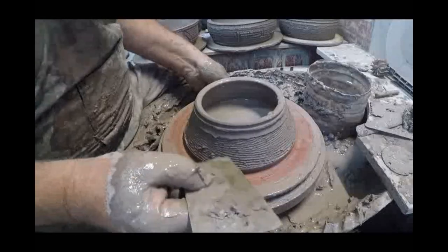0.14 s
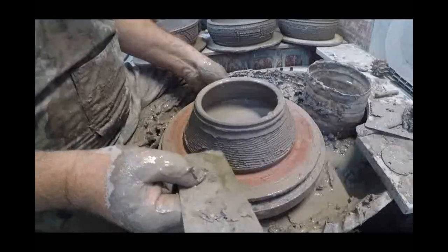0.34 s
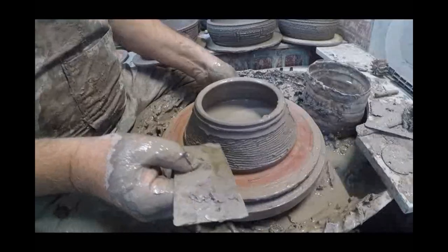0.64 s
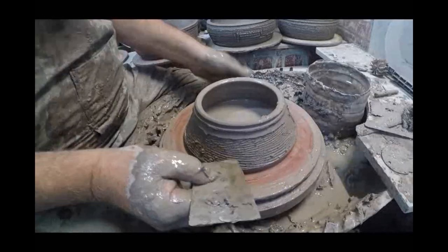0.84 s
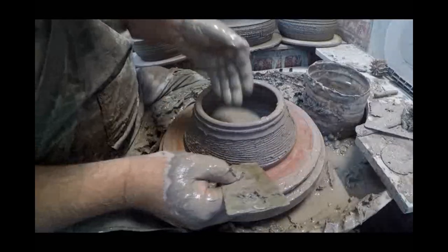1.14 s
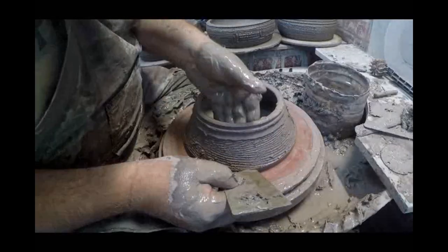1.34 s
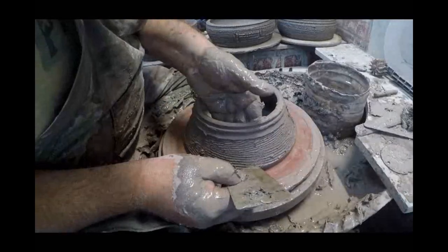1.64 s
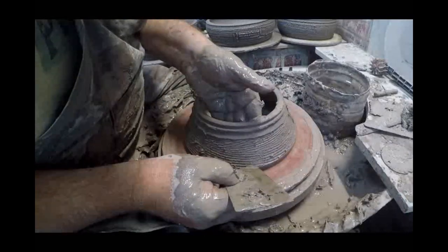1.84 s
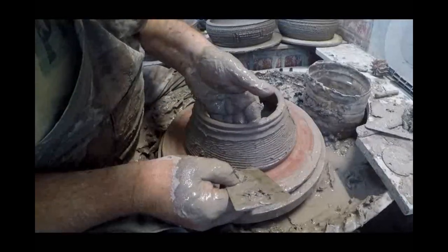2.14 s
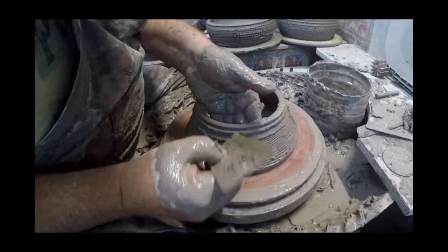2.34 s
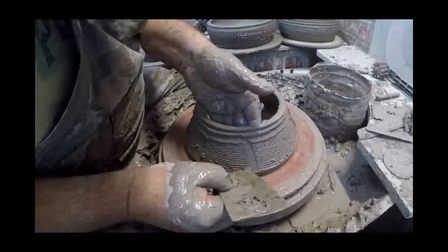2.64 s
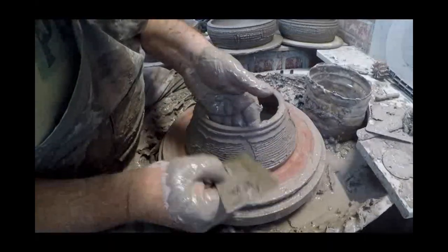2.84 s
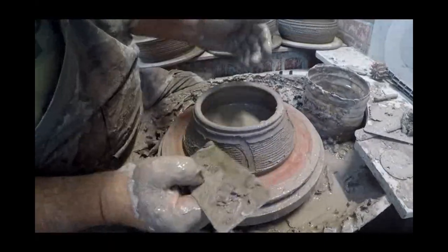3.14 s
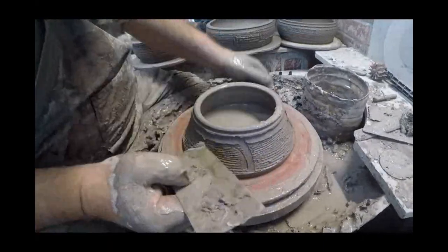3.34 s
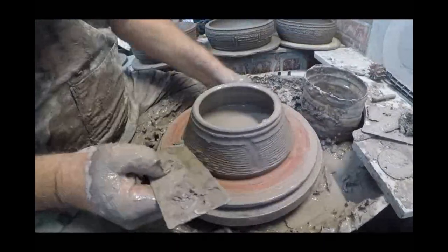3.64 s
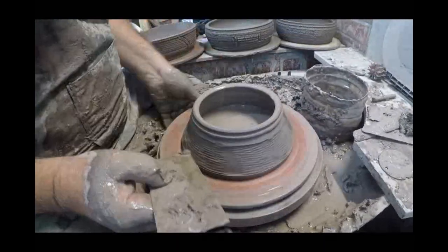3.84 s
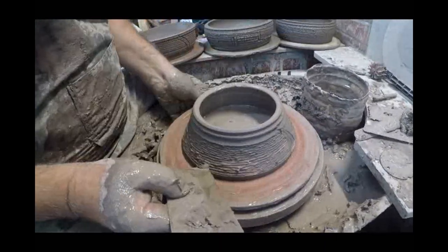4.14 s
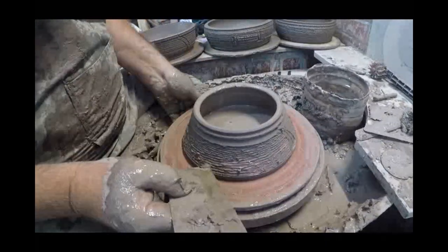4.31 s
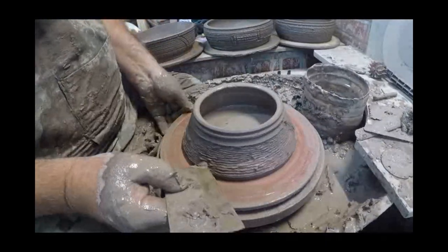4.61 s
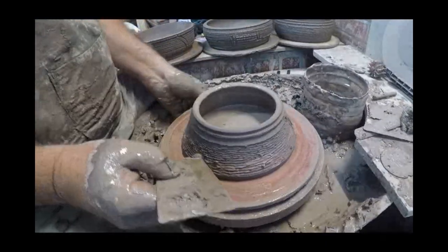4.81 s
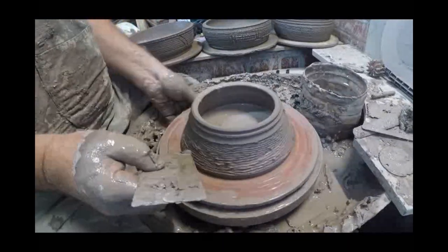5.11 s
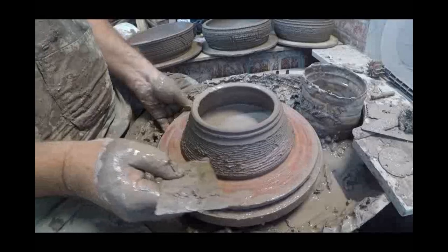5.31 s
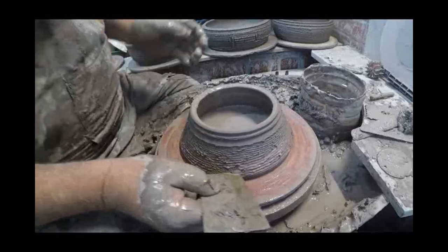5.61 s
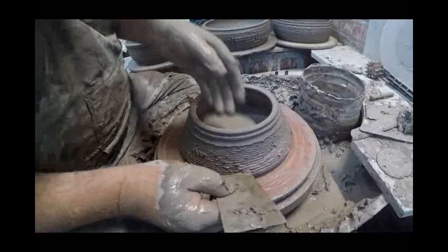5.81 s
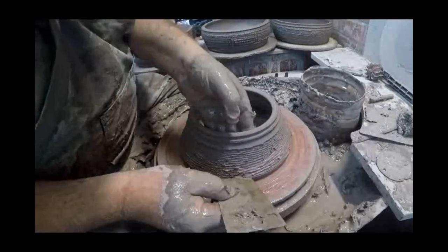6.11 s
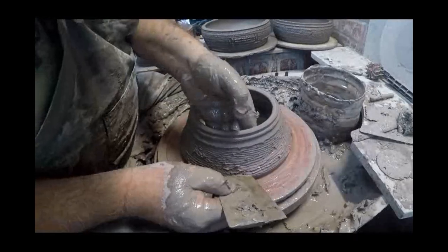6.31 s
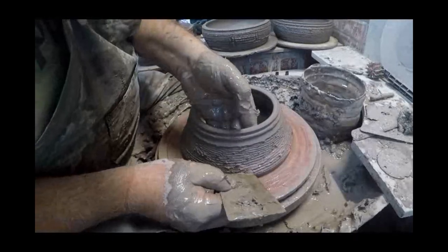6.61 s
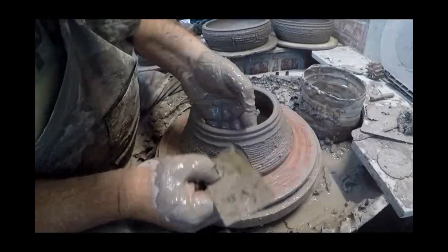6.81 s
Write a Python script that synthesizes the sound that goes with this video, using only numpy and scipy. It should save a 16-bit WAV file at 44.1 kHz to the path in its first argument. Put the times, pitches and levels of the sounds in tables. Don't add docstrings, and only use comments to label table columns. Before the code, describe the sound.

Close to a pottery wheel: constant deep hum and rattly frame rumble, faint wet hiss of clay, brief gritty scrapes, small squeaks and soft thuds.

```python
import sys
import numpy as np
from scipy import signal
from scipy.fft import rfft, irfft, next_fast_len
from scipy.io import wavfile

SR = 44100
rng = np.random.default_rng(int(sys.argv[2]) if len(sys.argv) > 2 else 0)


def undo_db(level):
    steps = np.asarray(level, float) / 20
    return 10 ** steps


def put_to_file(sound):
    columns = np.atleast_2d(sound).T
    safe = np.clip(columns, -1, 1)
    whole_steps = np.round(safe * 32767)
    wavfile.write(sys.argv[1], SR, whole_steps.astype(np.int16))


N = 307105
T = np.arange(N) / SR
BINS = next_fast_len(N)
BIN_HZ = np.fft.rfftfreq(BINS, 1 / SR)


def evened(x):
    return x / np.sqrt(np.mean(x ** 2) + 1e-20)


def read(points):
    hz, value = np.transpose(points)
    return np.interp(np.log(BIN_HZ + 1), np.log(hz + 1), value)


def column(rows, order):
    rows = np.asarray(rows)
    return np.interp(T, rows[:, 0], rows[:, order])


def white():
    real, imaginary = rng.standard_normal((2, len(BIN_HZ)))
    return (real + 1j * imaginary) * np.sqrt(len(BIN_HZ) * SR / 2)


def modes(table, skirt):
    power = 0
    for hz, width_hz, db in table:
        power = power + undo_db(db) ** 2 / (1 + (2 * (BIN_HZ - hz) / width_hz) ** 2) ** skirt
    return np.sqrt(power)


def flicker(rate_hz, depth_db):
    wander = irfft(white() / (1 + (BIN_HZ / rate_hz) ** 4))[:N]
    return undo_db(depth_db * evened(wander))


# frequency in Hz [Hz], level of the left in dB [dB].
LEFT_DB = [(25, -0.5), (45, -5.5), (110, -2.5), (200, -8.5), (370, -8.5), (680, -3.5), (1260, -4.5),
           (2300, 0), (4250, -.5), (7800, -0.5), (14400, -3)]


def ports(magnitude, alike, lead_rad):
    alike = np.clip(alike, 0, 1)
    right = white()
    shared = alike * right * np.exp(1j * lead_rad)
    unrelated = np.sqrt(1 - alike ** 2) * white()
    left = (shared + unrelated) * undo_db(read(LEFT_DB))
    return irfft(np.array([left, right]) * magnitude)[:, :N]


# frequency in Hz [Hz], lead in radians [rad].
LEFT_LEAD = [(30, -.3), (100, -.2), (200, 0.5), (260, 0.9), (350, 1.73), (500, 2.67), (700, 3.09),
             (1250, 2.97), (1500, 0.99), (1800, 0.9)]


def carried(x):
    left = rfft(x, BINS) * undo_db(read(LEFT_DB)) * np.exp(1j * read(LEFT_LEAD))
    return np.array([irfft(left)[:N], x])


# time in seconds [s], hum level in dB [dB].
HUM_LOAD = [
    (.4, -14),
    (.75, -13.5),
    (1.4, -13.7),
    (2.2, -13.5),
    (5.3, -13.5),
    (5.9, -14),
    (6.9, -14.1),
]
# frequency in Hz [Hz], rms level in dB [dB].
FAINT_TONES = [(49.9, -45), (225.3, -48), (250.2, -55), (300.2, -52.5), (400.4, -51), (599.6, -52),
               (899.2, -60), (999.3, -71), (1098.9, -63), (1123.8, -70), (1174.2, -72), (1299.4, -70),
               (1399.7, -73), (1424.6, -72), (1499.9, -70), (1800, -69.5), (3324.9, -85), (3630.4, -83)]


def hum():
    hum_hz, start_rad = 100.171, 3.17
    lead_hz, lead_rad = np.transpose(LEFT_LEAD)
    lead = np.interp(np.log(hum_hz), np.log(lead_hz), lead_rad)
    angle = 2 * np.pi * hum_hz * T + start_rad + np.array([[lead], [0]])
    port_db = np.array([[-3.9], [2.9]])
    main = np.sqrt(2) * np.cos(angle) * undo_db(column(HUM_LOAD, order=1) + port_db)
    waver = flicker(6.6, 2.8)
    faint = np.zeros(N)
    for hz, db in FAINT_TONES:
        own = np.roll(waver, rng.integers(N))
        faint += np.sqrt(2) * undo_db(db) * own * np.sin(2 * np.pi * (hz * T + rng.random()))
    fan = np.sqrt(2) * undo_db(-69) * waver * np.sin(2 * np.pi * 1049.1 * T)
    return main + undo_db(0.5) * carried(faint) + fan


# time in seconds [s], shaking of the stand in dB [dB].
SHAKE = [(.1, -39), (.5, -35), (.75, -40.5), (1.5, -34.5), (1.85, -36), (2.9, -35), (3.5, -38), (3.7, -33),
         (4.3, -36.5), (5.3, -34), (5.8, -30.5), (6.2, -32.5), (6.85, -29)]
# frequency in Hz [Hz], width in Hz [Hz], density in dB per Hz [dB].
STAND_MODES = [(24, 9, -44), (48, 8, -49), (65, 10, -50), (81, 8, -53)]
# frequency in Hz [Hz], width in Hz [Hz], density in dB per Hz [dB].
PAN_MODES = [(110, 37, -54.5), (126.5, 66, -53.5), (190, 60, -65)]
# frequency in Hz [Hz], width in Hz [Hz], density in dB per Hz [dB].
STEEL_MODES = [(216, 24, -61.5), (262, 73, -66), (349, 14, -58.5), (362, 15, -54.5), (396.2, 14, -58),
               (427, 20, -64), (462, 15, -66.5), (500, 7, -59), (519, 8, -52), (545, 25, -65),
               (634, 20, -54), (661, 10, -54), (682, 25, -56.5), (700, 10, -53), (718, 10, -57),
               (732, 16, -56), (792, 20, -64), (831, 12, -66), (885, 15, -71), (933, 12, -65),
               (972, 16, -73), (1000, 30, -76), (1100, 50, -78), (1174, 14, -74), (1200, 14, -75),
               (1240, 15, -77), (1300, 50, -79), (1500, 23, -78.5), (1446, 14, -79)]
# frequency in Hz [Hz], likeness from 0 to 1 [1].
ALIKE = [(25, 0.42), (60, 0.94), (100, 0.95), (180, .8), (280, 1), (350, 0.76), (430, 0.72), (550, 1),
         (800, 0.9), (1000, 0.57), (1500, 0.41)]


def frame():
    alike, lead = read(ALIKE), read(LEFT_LEAD)
    shake_db = column(SHAKE, order=1)
    pan_db = -40.5 + 0.33 * (shake_db - shake_db.mean())
    stand = evened(ports(modes(STAND_MODES, 1.6), alike, lead)) * undo_db(shake_db + 3.5)
    pan = evened(ports(modes(PAN_MODES, 1.3), alike, lead)) * undo_db(pan_db)
    steel = ports(modes(STEEL_MODES, 1.21), alike, lead) * undo_db(-0.67) * flicker(36, 1.0)
    return stand + pan * flicker(3.3, 2.8) + steel * flicker(1.9, 0.7)


def swelling_note(rows, rest_db, boost_db, unsteady_hz):
    power = undo_db(2 * rest_db)
    for s, half_s, db, _ in rows:
        power = power + undo_db(2 * db) * np.exp(-((T - s) / half_s) ** 2)
    pitch_hz = column(rows, order=3) * flicker(unsteady_hz, 0.055)
    note = np.sqrt(2 * power) * np.sin(2 * np.pi * np.cumsum(pitch_hz) / SR)
    return carried(note * undo_db(boost_db) * flicker(unsteady_hz, 0.94))


# peak in seconds [s], half length in seconds [s],
# level in dB [dB], pitch in Hz [Hz].
MOANS = [(0.22, 0.023, -42, 357.3), (0.58, 0.11, -42.5, 358.1), (0.81, 0.03, -41, 355),
         (1.0, 0.054, -39, 357), (1.22, 0.03, -36.5, 355.2), (1.64, 0.036, -43.5, 355.3),
         (2.03, 0.03, -43, 357), (2.11, 0.023, -39.5, 356), (2.3, 0.023, -39, 356), (2.5, 0.025, -40, 358),
         (2.6, 0.064, -43.5, 358), (2.76, 0.026, -40.5, 358), (2.97, 0.1, -41.5, 355),
         (3.23, 0.027, -43, 354), (3.59, 0.033, -41.5, 357.6), (3.81, 0.053, -37.0, 357.6),
         (4.23, 0.1, -39.5, 354.6), (4.51, 0.12, -38.5, 355), (4.89, 0.1, -42.5, 354.6),
         (5.24, 0.05, -42, 353.2), (5.61, 0.07, -42.5, 354.6), (5.82, 0.03, -40.5, 354),
         (5.88, 0.067, -39.5, 357), (5.93, 0.03, -40, 360), (6.15, 0.063, -40, 355),
         (6.31, 0.036, -39.5, 358), (6.67, 0.05, -40.5, 361.4), (6.93, 0.04, -43, 355.3)]


def moan():
    return swelling_note(MOANS, rest_db=-53.5, boost_db=5.0, unsteady_hz=25)


# peak in seconds [s], half length in seconds [s],
# level in dB [dB], pitch in Hz [Hz].
BOUNCES = [(0.36, 0.056, -28.5, 62), (1.45, 0.05, -32, 64), (1.88, 0.07, -33.5, 63.5),
           (2.3, 0.07, -33.5, 65.8), (2.6, 0.05, -36, 64.05), (3.03, 0.043, -34.5, 62.6),
           (3.79, 0.05, -33, 62.6), (4.35, 0.07, -38, 63.23), (4.8, 0.05, -33, 60.9),
           (5.11, 0.23, -35.0, 63.2), (5.31, 0.06, -38.5, 63.8), (5.6, 0.05, -31.0, 64.8),
           (5.97, 0.05, -35.5, 67), (5.98, 0.2, -28, 66.54), (6.25, 0.05, -31.0, 63.2),
           (6.61, 0.05, -37.5, 64.45), (6.72, 0.2, -30, 65.5), (6.77, 0.063, -39, 64.7)]


def bounce():
    return swelling_note(BOUNCES, rest_db=-42, boost_db=-1.0, unsteady_hz=12)


# loudest moment in seconds [s], rise in seconds [s], fall in seconds [s],
# hiss level in dB [dB], wetness from 0 to 1 [1].
STROKES = [(2.28, 0.032, .04, -57.5, 0.97), (2.335, .045, 0.051, -53.5, .55),
           (2.888, .015, .025, -56.5, .7), (2.93, .03, .06, -60, .6), (3.64, .04, .05, -61, 0.3),
           (3.812, 0.01, .035, -53.5, .05), (3.86, .02, .03, -58.5, 0.3), (3.924, 0.019, .04, -51.5, .1),
           (3.971, 0.022, 0.057, -54, .2), (4.054, .035, 0.077, -49.5, 0), (4.76, .04, .04, -58.5, .3),
           (6.77, 0.053, .045, -55, .7)]
# frequency in Hz [Hz], width in Hz [Hz], level in dB [dB].
GRIT = [(5700, 1400, -4.5), (6980, 2100, 0.5)]
# frequency in Hz [Hz], width in Hz [Hz], level in dB [dB].
EDGE = [(8800, 1200, 0.5), (10100, 1200, -5.5), (13200, 4000, -9.5)]
# frequency in Hz [Hz], width in Hz [Hz], level in dB [dB].
BODY = [(2370, 1300, 0.48), (3850, 1100, -3.5)]
# frequency in Hz [Hz], width in Hz [Hz], level in dB [dB].
RIB_MODES = [(1500, 70, 4), (1640, 70, 1), (2660, 90, -3), (4090, 110, -7), (5400, 60, -12),
             (6480, 90, -11)]
# grit, edge, body and ring against the hiss, in dB [dB].
DRY_DB = [-0.2, -11.5, -3, -1.5]
# grit, edge, body and ring against the hiss, in dB [dB].
WET_DB = [-0.9, 1.5, -4.5, -12]


def strokes():
    dulling = 1 + (BIN_HZ / 12100) ** 6
    parts = [evened(ports(modes(part, 1.4) / dulling, 0.41, 0)) for part in (GRIT, EDGE, BODY)]
    parts.append(evened(ports(modes(RIB_MODES, 1.5), 0.7, 0)))
    power = np.zeros((len(parts), N))
    for s, rise_s, fall_s, db, wet in STROKES:
        side_s = np.where(T < s, rise_s, fall_s)
        bell = np.exp(-2 * np.abs((T - s) / side_s) ** 2.4)
        part_db = db + np.add(DRY_DB, wet * np.subtract(WET_DB, DRY_DB))
        power += undo_db(2 * part_db)[:, None] * bell
    scrape = sum(np.sqrt(p) * part for p, part in zip(power, parts))
    return scrape * flicker(60, 1.3) * flicker(500, 1.1)


# start in seconds [s], length in
# seconds [s], level in dB [dB], pitch in Hz [Hz], glide per length as a share of pitch [1].
SQUEAKS = [(.85, .012, -60, 2640, .01), (.9, .05, -52, 940, .04), (.98, .05, -49, 990, .03),
           (2.885, .012, -57, 5200, .01), (3.625, .016, -58, 4100, .01), (3.66, .012, -60, 4050, .01),
           (3.805, .012, -52, 6300, .01), (3.808, .01, -56, 5500, .01), (3.935, .028, -56, 4120, .01),
           (3.94, .035, -51, 1540, .01), (4.005, .022, -58, 4100, .01), (4.025, .03, -52, 2660, .01),
           (4.04, .03, -49, 1620, -.01), (4.07, .035, -47, 1490, .01), (4.1, .018, -55, 4050, .01),
           (4.72, .012, -60, 2660, .01), (4.755, .015, -59, 7000, .01), (5.55, .018, -57, 2800, .01),
           (6.545, .03, -36, 700, -.02), (6.755, .03, -57, 5300, .01)]


def squeaks():
    out = np.zeros(N)
    wobble = flicker(120, 0.1)
    for s, length_s, db, hz, glide in SQUEAKS:
        u = np.arange(0, 3, 1 / (length_s * SR))
        start = round(s * SR)
        span = slice(start, start + len(u))
        turns = np.cumsum(hz * (1 + glide * u) * wobble[span]) / SR
        swell = np.tanh(6 * u) * np.exp(-u ** 2)
        out[span] += undo_db(db) * np.sin(2 * np.pi * turns) * swell
    return out * flicker(90, 2.5) * undo_db([[-1.1], [0.9]])


# time in seconds [s], hiss level in dB [dB].
RUB = [(0.06, -63), (0.38, -63.5), (1.3, -61.5), (1.64, -64), (2.84, -63.5), (3.03, -61.5), (3.85, -60.5),
       (3.98, -57.5), (4.14, -61), (4.27, -63.5), (4.46, -62.5), (4.77, -60.5), (5.24, -61.5), (5.76, -61),
       (6.21, -62.5), (6.9, -62.5)]
# frequency in Hz [Hz], density in dB per Hz [dB].
SLIP_COLOUR = [(900, -33), (2000, -2.5), (3500, -3), (4700, -8.5), (5600, -6), (7200, -4), (8700, -6.5),
               (10500, -9.5), (11500, -15), (14800, -29)]


def rub():
    hiss = evened(ports(undo_db(read(SLIP_COLOUR)), 0.12, 0))
    return hiss * undo_db(column(RUB, order=1) + 4.5) * flicker(44, 0.96)


# start in seconds [s], level in dB [dB], pitch in Hz [Hz],
# time to fall 60 dB in seconds [s].
KNOCKS = [
    (2.118, -29, 169.2, 0.11),
    (3.64, -22, 95, 0.094),
    (3.69, -27, 138.5, 0.068),
    (6.75, -37.5, 150.8, 0.086),
]


def knocks():
    low = np.zeros(N + SR)
    t = np.arange(SR // 4) / SR
    for s, db, hz, t60_s in KNOCKS:
        onset = np.minimum(t / 0.0051, 1)
        low[round(s * SR):][:len(t)] += undo_db(db - 60 * t / t60_s) * np.sin(2 * np.pi * hz * t) * onset
    return carried(low[:N])


# frequency in Hz [Hz], density in dB per Hz [dB].
AIR_COLOUR = [(120, -31), (200, -13.5), (500, -14.5), (900, -20.5), (1600, -22), (3200, -38), (4800, -41.5),
              (7000, -42.5), (10000, -45.5), (11300, -51), (12800, -62), (14800, -69)]


def air():
    noise = evened(ports(undo_db(read(AIR_COLOUR)) * (BIN_HZ > 150), 0.033, 0))
    return noise * undo_db(-49.5) * flicker(15, 0.16)


def scene():
    wheel = hum() + frame() + moan() + bounce()
    clay = strokes() + squeaks() + rub()
    return wheel + clay + knocks() + air()


def top_cut(x):
    return signal.sosfilt(signal.butter(12, 14960, fs=SR, output="sos"), x)


def record(dry):
    return top_cut(dry)


dry = scene()
out = record(dry)
put_to_file(out)
```